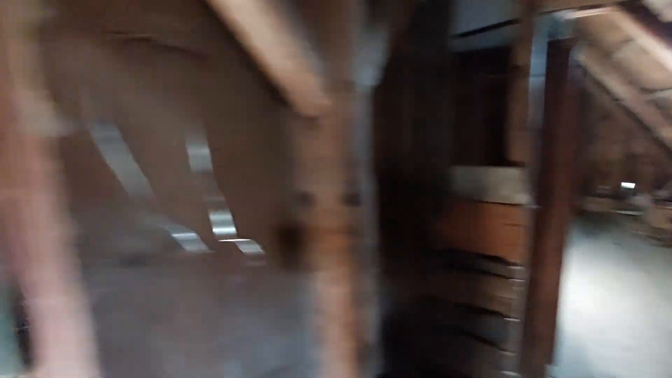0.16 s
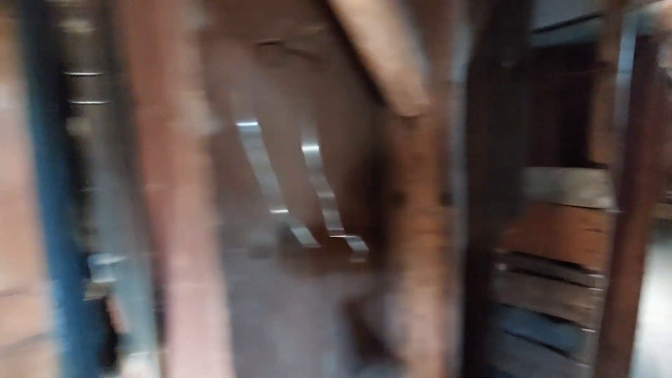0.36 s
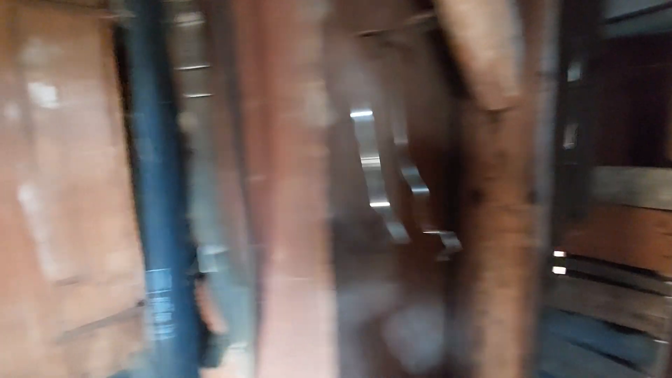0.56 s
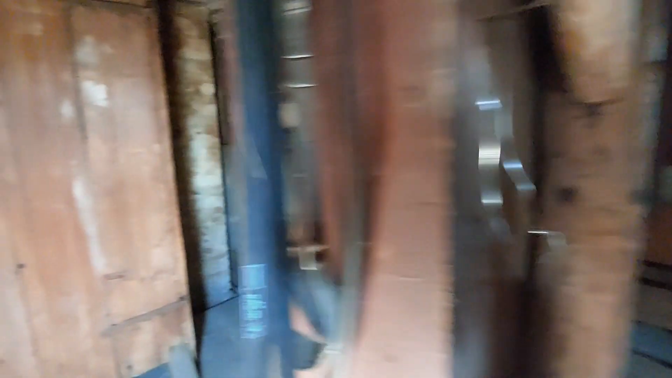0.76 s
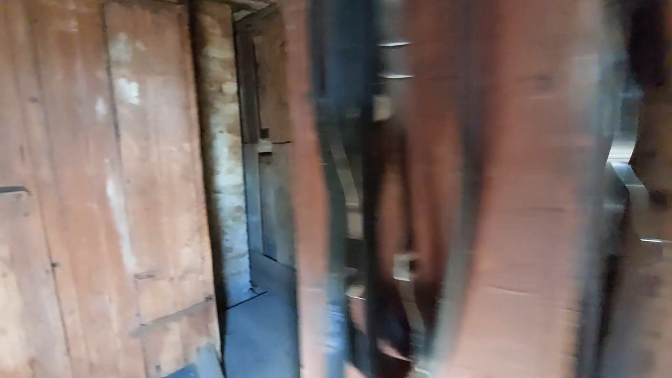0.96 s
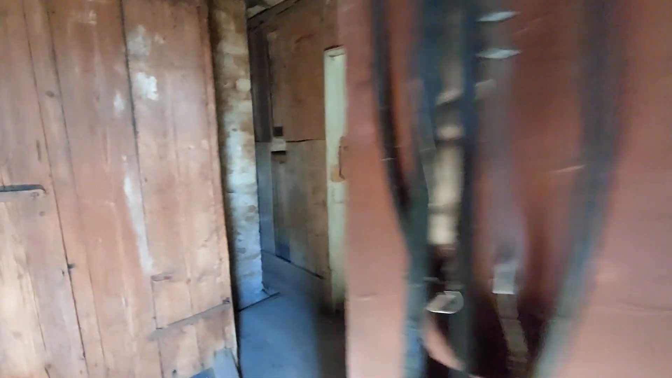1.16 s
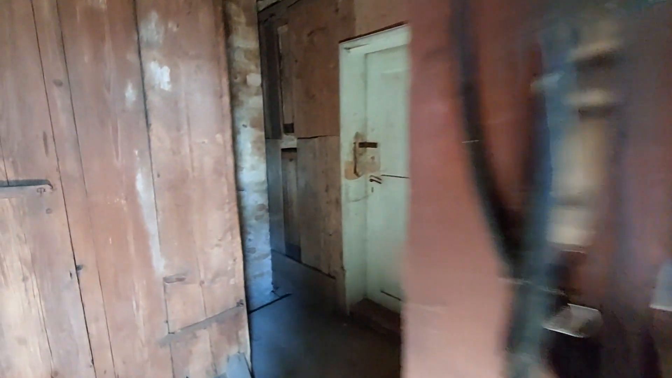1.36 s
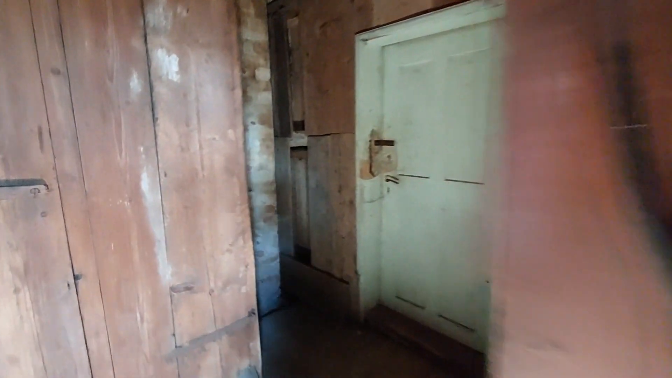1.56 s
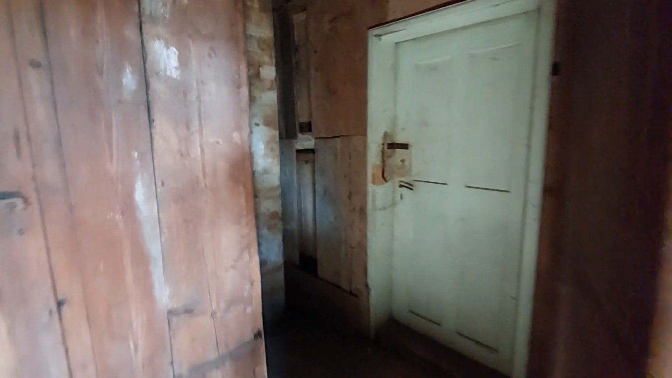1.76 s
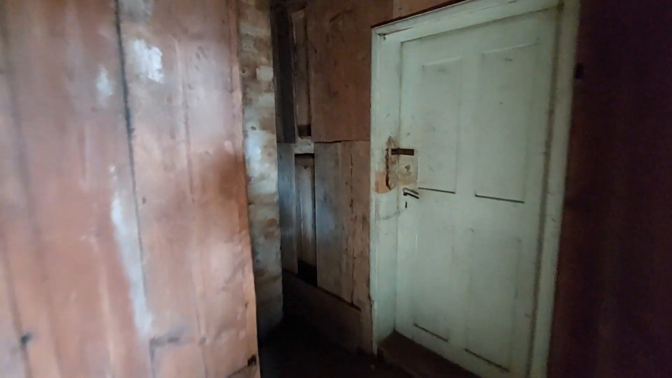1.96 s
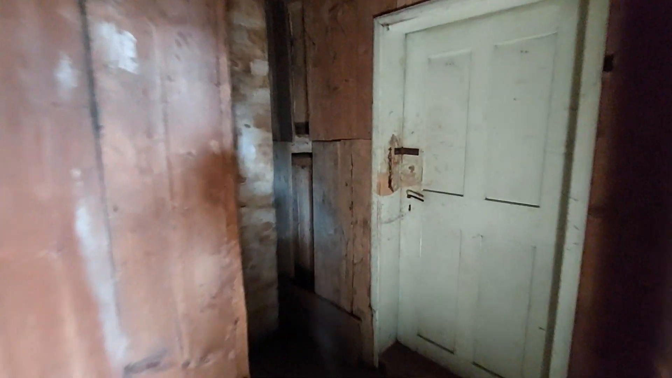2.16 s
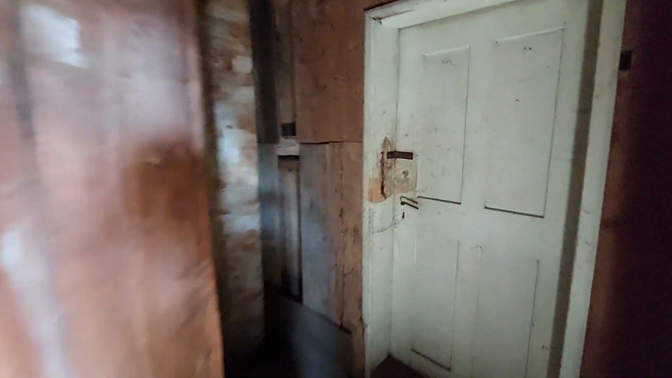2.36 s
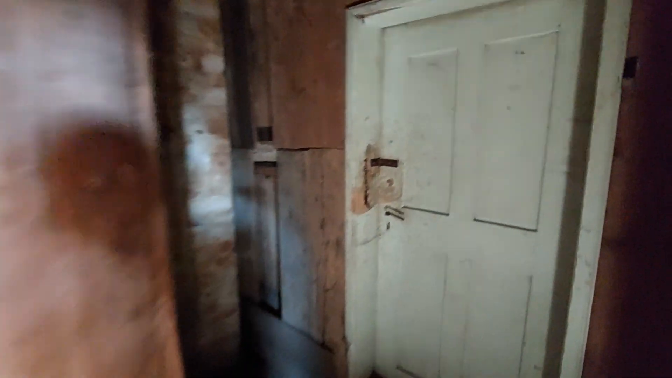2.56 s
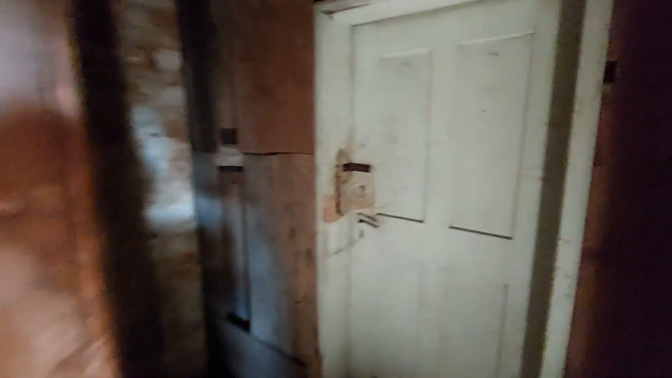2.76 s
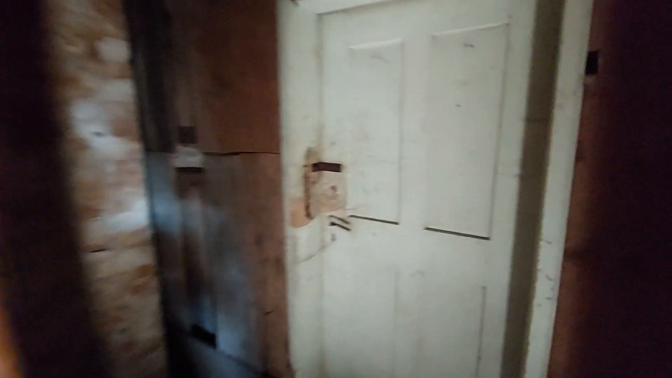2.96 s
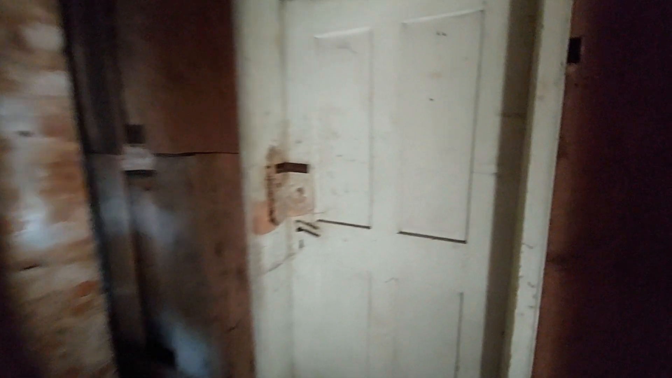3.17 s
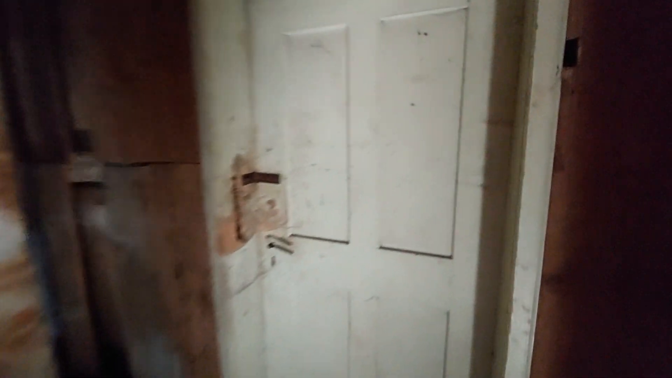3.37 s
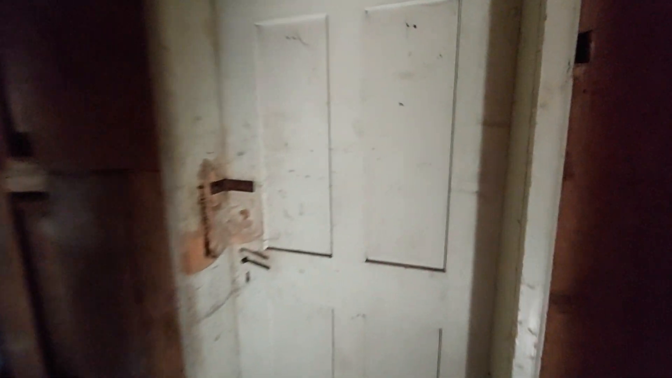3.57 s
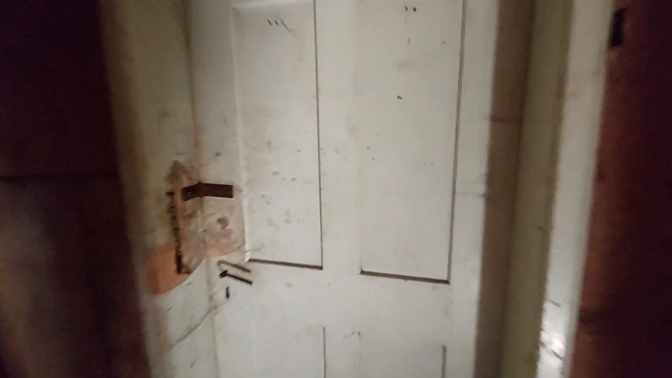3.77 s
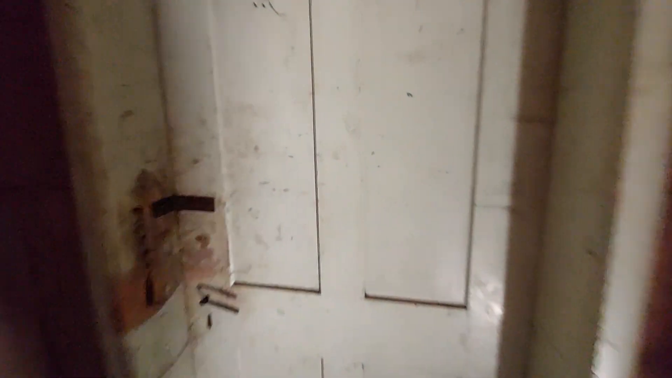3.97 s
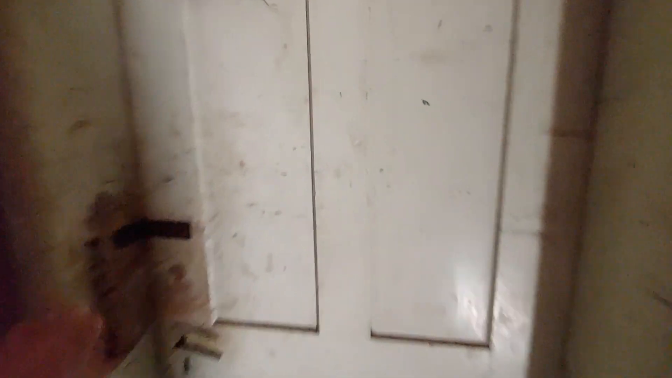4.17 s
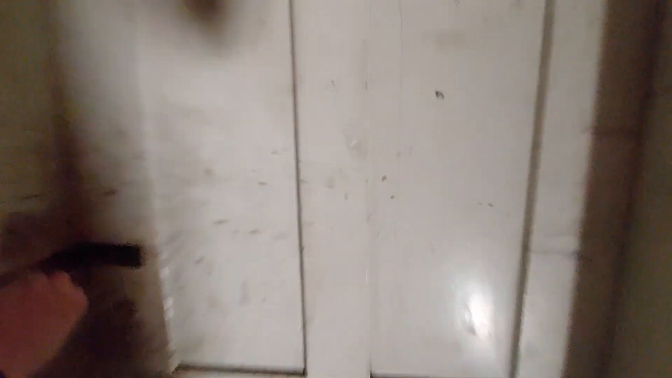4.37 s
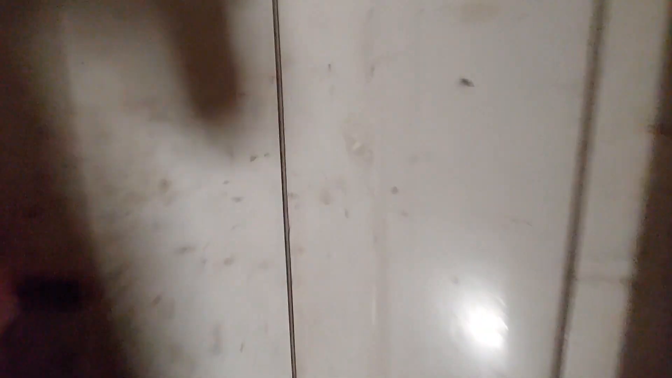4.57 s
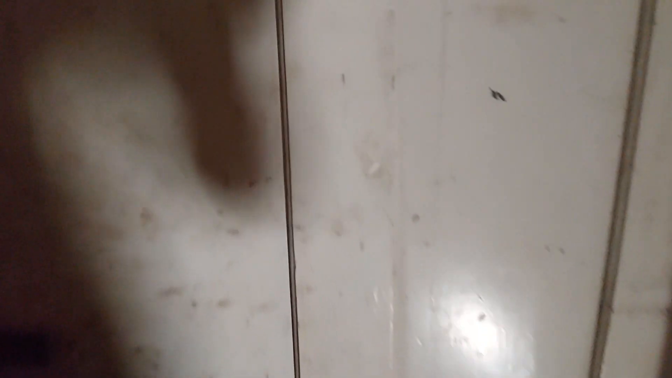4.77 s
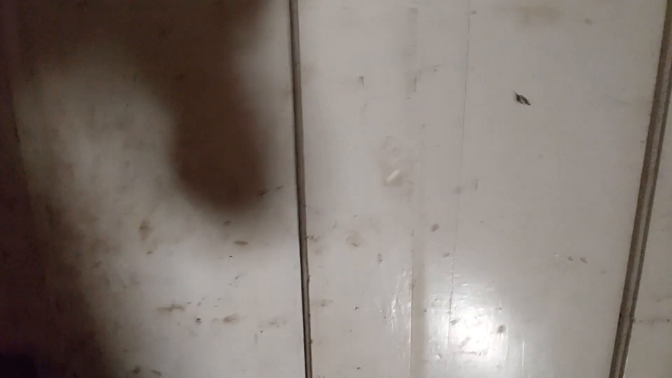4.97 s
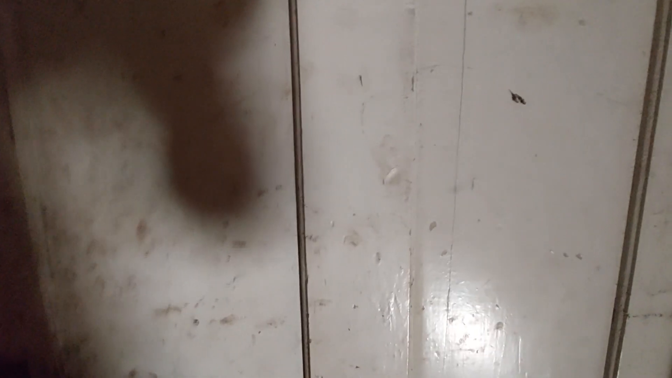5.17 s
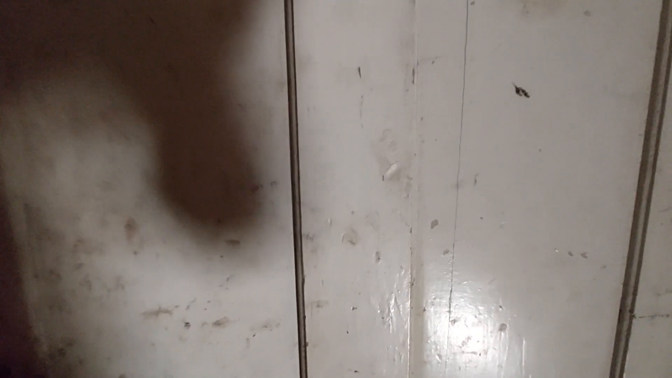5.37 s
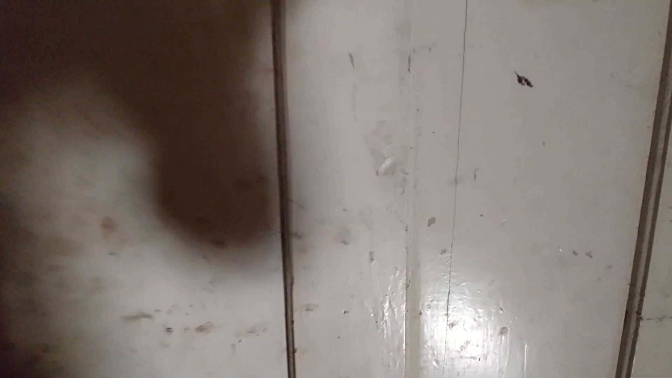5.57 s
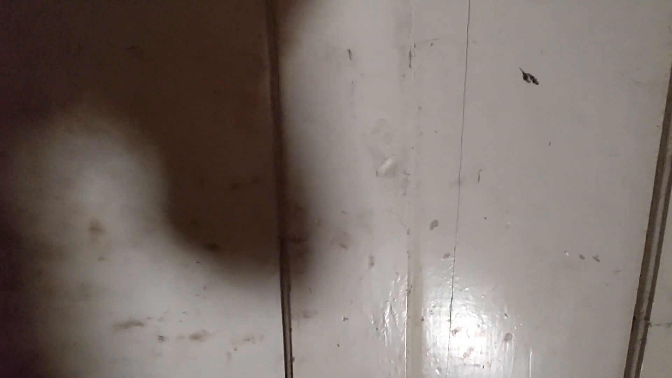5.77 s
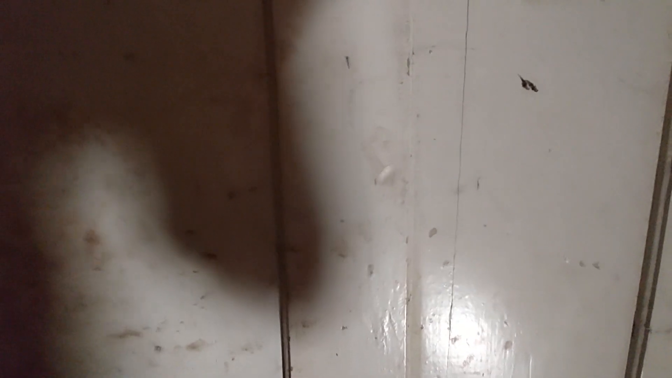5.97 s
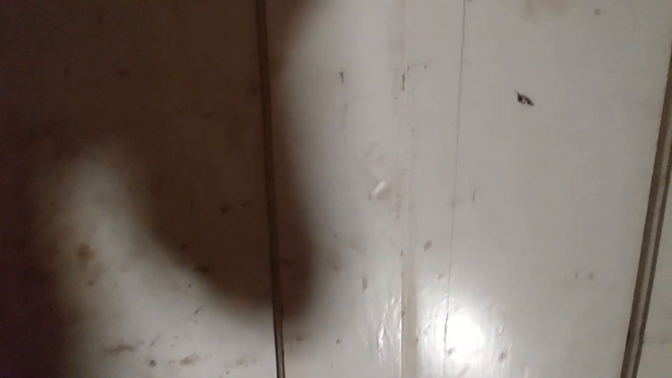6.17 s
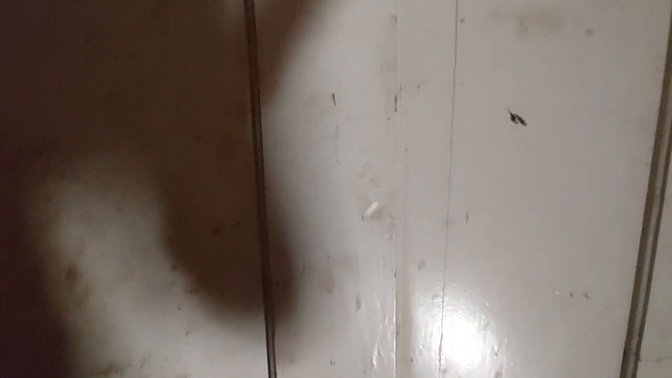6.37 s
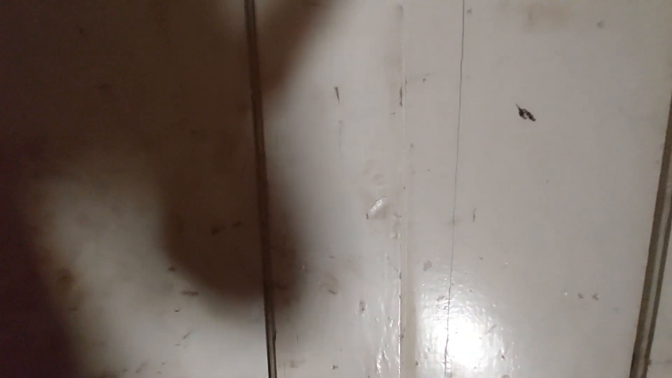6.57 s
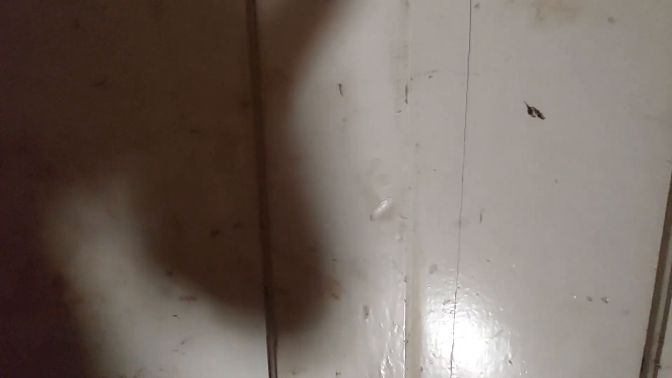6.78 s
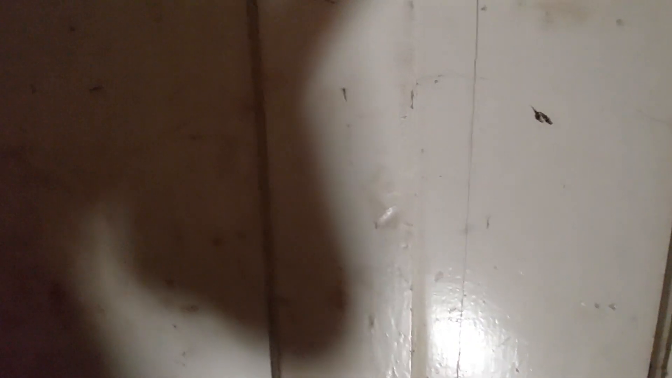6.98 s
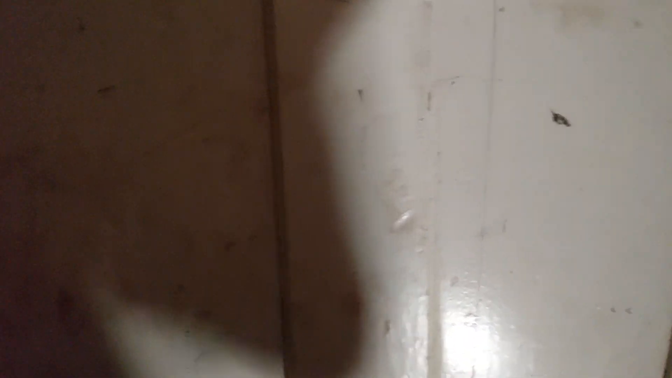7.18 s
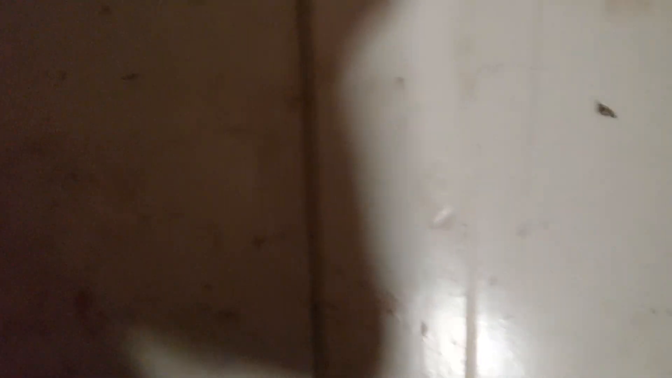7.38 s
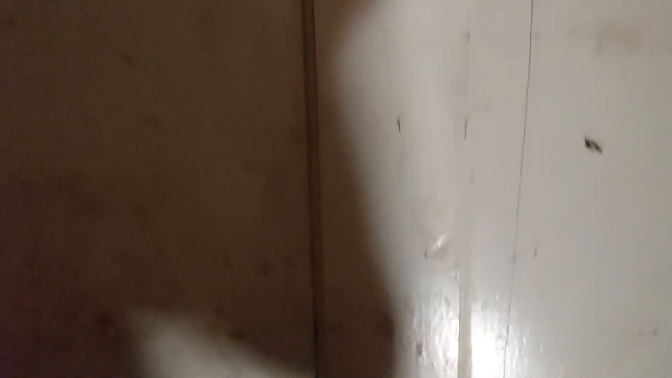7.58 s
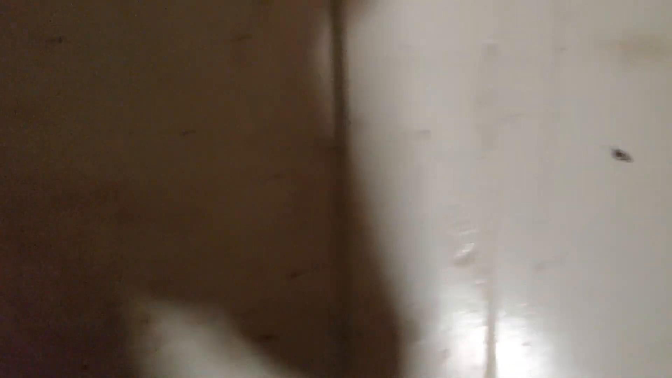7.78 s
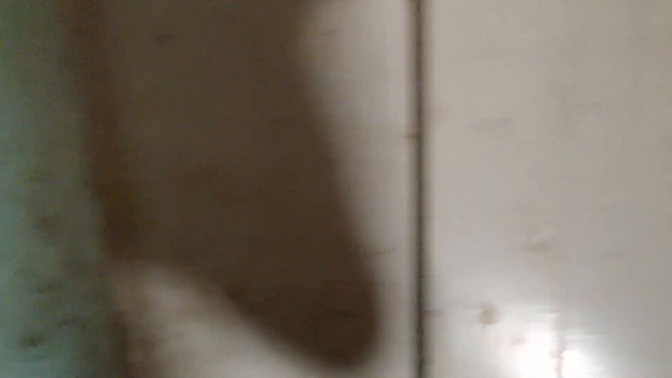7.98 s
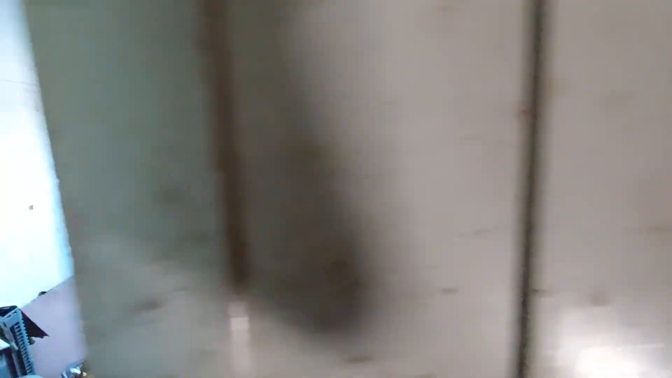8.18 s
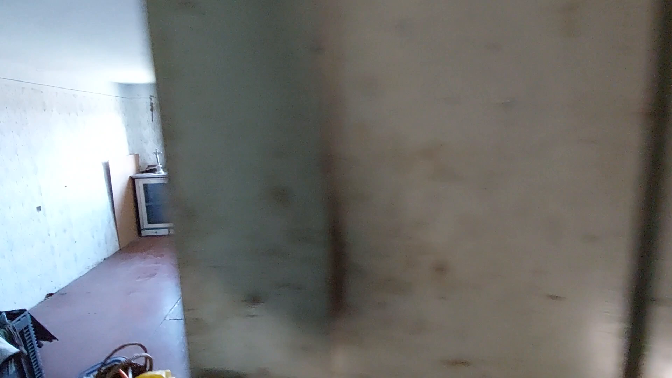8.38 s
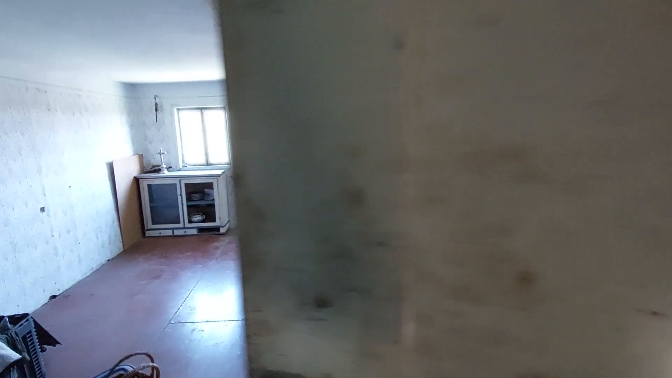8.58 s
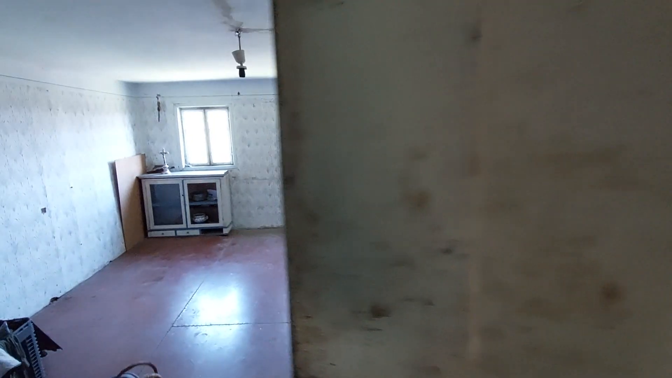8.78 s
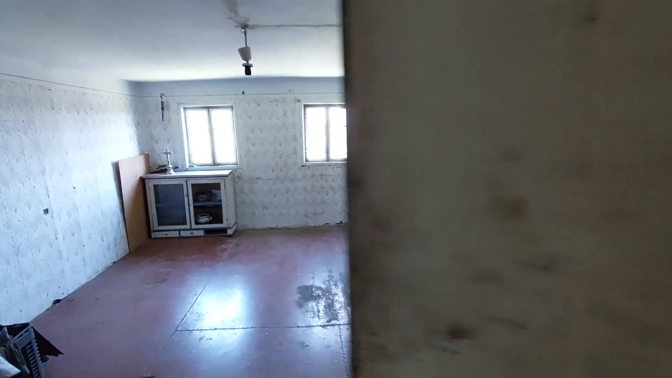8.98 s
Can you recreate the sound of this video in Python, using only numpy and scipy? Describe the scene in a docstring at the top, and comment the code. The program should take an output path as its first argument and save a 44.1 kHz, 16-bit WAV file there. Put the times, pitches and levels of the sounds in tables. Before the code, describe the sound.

Close by in a quiet attic, someone walks over hollow wooden boards, soles scuffing and grit crackling softly. The steps get heavier, then give way to small metal clicks at a door latch. The latch snaps loudly and the wooden panel thuds under repeated shoves, until the stuck door bursts open with a clatter and a tiny squeak. Faint footsteps end it, over a low background rumble.

```python
"""Footsteps cross bare attic floorboards; the walker works a stiff latch and pulls a wooden door open.
Heel and toe ring the boards, and grit cracks under the soles. Shoves ring the door panel, iron parts
click, and the door edge squeals as it tears free of the frame. Soles and clothes scuff; the attic
reverberates. Behind it all: rumble, hiss, a brief low hum and a far bird outside."""
import sys
import numpy as np
from scipy import signal
from scipy.fft import rfft, irfft, next_fast_len
from scipy.io import wavfile
from scipy.ndimage import uniform_filter1d

SR = 44100
rng = np.random.default_rng(int(sys.argv[2]) if len(sys.argv) > 2 else 0)


def pcm_store(signal):
    """Save signal as 16-bit PCM."""
    levels = np.round(np.clip(np.atleast_2d(signal), -1, 1) * 32767)
    wavfile.write(sys.argv[1], SR, levels.astype(np.int16).T)


N = 398663

# board modes: f/Hz, level/dB, nominal t60/s
BOARD_MODES = [(53.3, -5, 0.97), (69.2, 15, 0.11), (80.7, -2, 0.87), (97.9, -4.5, 0.48),
               (125.2, -6.5, 0.46), (150.7, 6.5, 0.18), (172.3, -11.5, 0.27), (211, -1.5, 0.13),
               (233.7, -2.5, 0.19), (293.4, 4, 0.07), (333, -1.5, 0.089), (369, 2, 0.097),
               (433, -1.5, 0.13), (488, 2.5, 0.077), (571, -2, 0.1), (670, -2.5, 0.081), (757, -4, 0.045),
               (920, -5, 0.07), (1210, -0.5, 0.015), (1700, -1, 0.04), (2100, -18, .04)]
# heel and toe blows: t/s, level/dB, centre f/Hz, t60 factor
FOOTFALLS = [(0.009, -47, 92, 0.64), (0.062, -39, 330, 0.6), (0.084, -32.5, 85, 0.32),
             (0.721, -47.5, 62, 0.95), (0.807, -36, 75, 0.5), (0.822, -29, 68, 0.78),
             (0.916, -39, 71.6, 0.47), (1.631, -25, 140, 0.74), (1.719, -31.5, 94, 0.64),
             (1.78, -39.5, 123, 0.53), (1.909, -42.5, 106, 0.99), (2.3, -47, 280, 1),
             (2.457, -33, 111, 0.47), (2.571, -34.5, 133, 0.8), (2.624, -37.5, 210, 0.8),
             (2.692, -38.5, 90, 0.9), (2.726, -44, 260, 1), (3.051, -24.5, 202, 0.62),
             (3.151, -33.5, 240, 0.27), (3.363, -44, 99, 0.38), (3.893, -18.5, 150, 0.65),
             (3.999, -32.5, 163, 0.24), (4.09, -44, 69.7, 0.45), (4.477, -14.5, 155, 0.55),
             (4.564, -29.5, 280, 0.28), (4.583, -30, 150, 0.5), (4.695, -41, 300, 0.68),
             (4.955, -22, 144, 0.4), (4.998, -32.5, 139, 0.4), (7.996, -36.5, 142, 0.64),
             (8.029, -43, 140, 0.5), (8.144, -36, 66, 0.3), (8.517, -47.5, 206.6, 1),
             (8.969, -54, 65.1, 0.8)]
def footsteps():
    """Feet ring the boards; low, hard blows reach more octaves up. The last steps are louder on the left."""
    s, db, hz, t60_factor = np.transpose(FOOTFALLS)
    above_oct = 1.4 - 0.51 * np.log2(hz / 100) + 0.002 * (db + 30.5)
    blows = zip(s, db, hz, t60_factor, above_oct)
    boards = thumps(blows, BOARD_MODES, below_oct=0.68, rise_cycles=0.34, roll_s=0.027, detune=0.02)
    pan_db = 4 * (np.arange(N) / SR > 7.9)
    return gain_of([pan_db, -pan_db]) * boards


def thumps(blows, modes, below_oct, rise_cycles, roll_s, detune):
    """Blows on wood: one contact, then weaker ones as the weight rolls on, slightly unlike per channel."""
    out = np.zeros((2, N))
    for s, db, hz, t60_factor, above_oct in blows:
        when, strength, *unlike = rng.random((4, 5))
        at = (roll_s * when * SR).astype(int)
        contacts = np.zeros((2, SR // 10))
        contacts[:, at] = 0.79 * (2 * strength - 1) + 0.14 * (2 * np.array(unlike) - 1)
        contacts[:, 0] = 1
        wood = ring(modes, hz, below_oct, above_oct, t60_factor, rise_cycles, detune, size=SR // 2)
        sound = signal.fftconvolve(wood[None], contacts, axes=1)
        add(out, s, gain_of(db) * sound / abs(sound).max())
    return out


def ring(modes, centre_hz, below_oct, above_oct, t60_factor, rise_cycles, detune, size):
    """A blow rings the modes near centre_hz; where it lands varies their phase, strength and tuning."""
    hz, db, t60 = np.transpose(modes)[:, :, None]
    t = np.arange(size) / SR
    phase, strength, tuning = rng.standard_normal((3, len(modes), 1))
    reach_oct = np.where(hz > centre_hz, max(above_oct, 0.2), below_oct)
    reach_db = -6 * (np.log2(hz / centre_hz) / reach_oct) ** 2
    level = gain_of(db + reach_db + 2.6 * strength - 60 * t / (t60 * t60_factor))
    attack = 1 - np.exp(-t * hz / rise_cycles)
    partials = np.sin(2 * np.pi * (hz * (1 + detune * tuning) * t + phase))
    sound = (level * attack * partials).sum(0)
    return sound / abs(sound).max()


# grit cracks: t/s, level/dB, top f/Hz
GRIT_CRACKS = [(0.0624, -38, 2400), (1.705, -36, 14000), (2.332, -43.5, 9000), (3.169, -45, 3520),
               (4.734, -43, 15000), (5.1722, -44.5, 5000)]
def grit():
    """Grit cracks under the soles in dry ticks."""
    out = np.zeros((2, N))
    for s, db, top_hz in GRIT_CRACKS:
        tick = snap(tilt_db_oct=-4, low_hz=400, top_hz=top_hz, rise_s=0.00077, t60_s=0.035)
        add(out, s, gain_of(db) * tick)
    return out


# panel modes: f/Hz, level/dB, nominal t60/s
PANEL_MODES = [(60, 6.5, 0.22), (89, -0.5, 0.79), (110, 2, 0.21), (153, 1.5, 0.19), (203.6, 3, 0.18),
               (237, 3.5, 0.37), (296, -5, 0.094), (340, -6, 0.12), (430, -6, 0.15), (480, 3, 0.11),
               (598, -9, 0.12), (655, -7.5, 0.12), (718, -1, 0.08), (815, -1, 0.064), (940, -1.5, 0.08),
               (1300, -6, 0.074)]
# blows and shoves: t/s, level/dB, centre f/Hz, upward reach/oct
PANEL_BLOWS = [(5.858, -37.5, 554, 3.1), (5.896, -35, 153, 5.8), (6.032, -41, 222, 3.9),
               (6.259, -36.5, 258.5, 2.3), (6.482, -46, 220, 0.54), (6.521, -44.5, 464, 0.39),
               (6.755, -25, 223.7, 0.63), (6.788, -9.5, 470, 0.89), (6.796, -19.5, 69.9, 0.42),
               (6.815, -16, 230, 0.6), (6.842, -14.5, 150.7, 0.74), (6.862, -17, 114.5, 0.6),
               (6.883, -19.5, 124.6, 0.55), (6.968, -22, 880, 0.5), (6.971, -21, 241, 0.8),
               (7.022, -25, 860, 0.4), (7.148, -21, 229.2, 0.93), (7.159, -21, 107.7, 0.5),
               (7.258, -26.5, 117.2, 1.5), (7.383, -11.5, 472, 0.61), (7.408, -13.5, 521.4, 1.4),
               (7.428, -19, 201.6, 1.4), (7.449, -17, 462, 3.5), (7.462, -22.5, 948, 0.6),
               (7.469, -19, 130, 1), (7.686, -17.5, 300.8, 1.15), (7.721, -24.5, 93, 1.36)]
def door_panel():
    """Blows ring the panel, shorter while it is pressed into the frame."""
    s, db, hz, above_oct = np.transpose(PANEL_BLOWS)
    pressed = (s > 6.78) & (s < 7.2)
    t60_factor = np.where(pressed, 0.32, 0.72)
    blows = zip(s, db, hz, t60_factor, above_oct)
    return thumps(blows, PANEL_MODES, below_oct=0.7, rise_cycles=0.18, roll_s=0.015, detune=0.0079)


# iron modes: f/Hz, level/dB, nominal t60/s
IRON_MODES = [(1617, 2.5, 0.11), (1765, -6, 0.15), (2080, -3, 0.08), (2400, -3.5, 0.041), (2719, -4, 0.063),
              (3150, 1, 0.1), (3680, -2, 0.07), (4200, -9, 0.068), (5220, -5.5, 0.07), (6400, -11, 0.048),
              (7400, -3.5, 0.064), (9115, -10, .05), (10500, 4, .05), (12900, 4, .04), (14500, 4, .04)]
# latch, key and bolt: t/s, level/dB, centre f/Hz, tilt/(dB/oct)
LATCH_CLICKS = [(4.744, -32, 3850, 1), (4.752, -35, 1670, -17), (4.807, -45, 2260, 0),
                (4.822, -38, 2300, -5), (5.097, -46, 1650, -8), (5.504, -57.5, 1710, -4.5),
                (5.6299, -54.5, 1590, -1.5), (5.8604, -33, 3400, -1.5), (5.896, -27, 2800, -6.5),
                (6.0353, -38.5, 2520, -3.5), (6.257, -54, 2420, -4.5), (6.518, -53.5, 2723, -5),
                (6.6156, -33.5, 7500, 0), (6.767, -39.5, 2500, -10.5), (6.791, -1, 3000, -4),
                (6.969, -36, 2400, -5.5), (7.0392, -38, 1732, -7), (7.149, -42.5, 3795, -5),
                (7.192, -45, 1800, -14.5), (7.257, -53.5, 5610, -3.5), (7.3821, -13.5, 13200, 2),
                (7.393, -8, 2600, -3), (7.4263, -8.5, 2083, -9), (7.448, -2.5, 2180, -4.5),
                (7.6876, -32, 2130, -0.5), (7.708, -38, 2100, -4), (7.7243, -32, 2140, 1)]
def latch(pan_db=0.75):
    """Each click is a snap and the iron it sets ringing, slightly to the left."""
    out = np.zeros((2, N))
    for s, db, hz, tilt_db_oct in LATCH_CLICKS:
        top_hz = 1.2 * hz * 2 ** ((db + 31) / 11)  # harder is brighter
        contact = snap(tilt_db_oct, 0.3 * hz, top_hz, rise_s=0.0014, t60_s=0.032)
        iron = ring(IRON_MODES, hz, below_oct=0.45, above_oct=0.69, t60_factor=0.18,
                    rise_cycles=1.8, detune=0.027, size=SR // 8)
        add(out, s, gain_of([[db + pan_db], [db - pan_db]]) * (contact + gain_of(-4.5) * iron))
    return out


def snap(tilt_db_oct, low_hz, top_hz, rise_s, t60_s):
    """Fast-dying noise burst, peak 1, partly unlike per channel."""
    t = np.arange(SR // 8) / SR
    common, *sides = band_noise(tilt_db_oct, low_hz, top_hz, channels=3, size=len(t))
    envelope = gain_of(-60 * t / t60_s) * (1 - np.exp(-t / rise_s))
    sound = (common + 0.79 * np.array(sides)) * envelope
    return sound / abs(sound).max()


# door edge slipping: t/s, f/Hz, level/dB
SQUEAL_CURVE = [(7.389, 2420, -23), (7.416, 2707, -27), (7.422, 2143, -29.5), (7.429, 2060, -21.5),
                (7.448, 1992, -26)]
def door_squeal():
    """Wood slips on wood: a rough tone and its octave climb, then drop."""
    out = np.zeros((2, N))
    s, hz, db = np.transpose(SQUEAL_CURVE)
    t = np.arange(s[0], s[-1], 1 / SR)
    pitch_hz = np.interp(t, s, hz)
    tone = rough_tone(pitch_hz, width_hz=110) + gain_of(-5.5) * rough_tone(2 * pitch_hz, width_hz=250)
    add(out, s[0], gain_of(np.interp(t, s, db)) * tone * signal.windows.tukey(len(t), 0.15))
    return out


def rough_tone(hz, width_hz):
    """Noise through a narrow resonance that follows the curve hz."""
    real, imag = rng.standard_normal((len(hz), 2)).T
    pole = np.exp(-np.pi * width_hz / SR)
    envelope = signal.lfilter([1], [1, -pole], real + 1j * imag)
    return unit_rms((envelope * np.exp(2j * np.pi * np.cumsum(hz) / SR)).real)


# noise swells: t/s, level/dB, tilt/(dB/oct), low f/Hz
NOISE_SWELLS = [(0.064, -57.5, -19.5, 900), (0.822, -59.5, -11, 200), (0.705, -72, -2, 1500),
                (1.359, -67.5, -5, 680), (1.63, -45, -7, 302), (1.766, -51, -9.5, 300),
                (2.22, -62.5, -4, 1580), (2.309, -50, -9, 300), (2.452, -53.5, -17.5, 300),
                (2.575, -55.5, -12.5, 250), (2.7, -58.5, -27, 394), (3.054, -56.5, -2, 500),
                (3.162, -54, -6.5, 300), (3.889, -65.5, -4.5, 500), (4.486, -67, -1.5, 1200),
                (4.568, -63.5, -5.5, 600), (4.695, -54.5, -7.5, 300), (4.75, -46.5, -10.5, 300),
                (4.812, -55, -6, 396), (4.958, -50, -6, 890), (5.054, -55.5, -6.5, 398),
                (5.092, -58, -9, 1190), (5.84, -64, -5, 700), (6.018, -54.5, -5.5, 696),
                (6.49, -66, -7, 1470), (6.757, -51, -10, 300), (7.365, -36.5, -8.5, 196),
                (7.388, -24.5, 9, 12000), (8.505, -74, -10, 300)]
def scuffs_and_swell():
    """Grainy scuffs; at 7.365 s, a short, dull swell of noise just before the door's loud crack."""
    out = np.zeros((2, N))
    t = np.arange(SR // 3) / SR
    for s, db, tilt_db_oct, low_hz in NOISE_SWELLS:
        length_s = np.clip(0.035 * 2 ** (-(db + 56.5) / 4.5), 0.041, 0.13)  # louder is shorter
        grain_db = 3.9 * unit_rms(uniform_filter1d(rng.standard_normal(len(t)), size=150))
        envelope = (1 - np.exp(-t / 0.0026)) * np.exp(-(t / length_s) ** 2)
        noise = band_noise(tilt_db_oct, low_hz, top_hz=SR, channels=2, size=len(t))
        add(out, s, gain_of(db) * envelope * unit_rms(gain_of(grain_db)) * noise)
    return out


# base spectrum of snaps, scuffs and swell: f/Hz, level/dB
BAND_SPECTRUM = [(200, -22.5), (500, 0.5), (1200, -2.5), (2200, -2), (3500, -1), (7000, -1), (16000, -10)]
def band_noise(tilt_db_oct, low_hz, top_hz, channels, size):
    """Tilted noise from low_hz to top_hz, faint above."""
    hz = np.fft.rfftfreq(size, 1 / SR)
    colour = gain_of(at_hz(BAND_SPECTRUM, hz) + tilt_db_oct * np.log2((hz + 300) / 4000))
    low_cut = 1 / (1 + (low_hz / (hz + 1)) ** 4)
    high_shelf = gain_of(-19) + 1 / (1 + (hz / top_hz) ** 6)
    white = rfft(rng.standard_normal((channels, size)))
    return unit_rms(irfft(white * colour * low_cut * high_shelf, size))


# attic decay: f/Hz, t60/s
ATTIC_DECAY = [(60, 1), (250, 0.34), (1000, 0.27), (2200, 0.28), (4500, 0.33), (8000, 0.24), (15000, 0.27)]
def attic(x, colour):
    """Sparse reflections die band by band, alike on both sides in the bass; three tails take turns."""
    out = np.zeros((2, N))
    turn = np.arange(N) / SR * 7.3
    for k in range(3):
        taps = np.zeros((2, SR))
        at = np.arange(120, SR - 20, 20) + rng.integers(0, 20, (2, (SR - 121) // 20))
        np.put_along_axis(taps, at, rng.choice([-1., 1.], at.shape), 1)
        hz, t, bands = signal.stft(taps, SR, nperseg=512, noverlap=448)
        coherence = 0.97 * np.exp(-(hz / 500) ** 2)[:, None]
        bands[1] = coherence * bands[0] + np.sqrt(1 - coherence ** 2) * bands[1]
        decay = gain_of(-60 * t / at_hz(ATTIC_DECAY, hz)[:, None])
        decay /= np.linalg.norm(decay, axis=1, keepdims=True)
        bands *= decay * gain_of(at_hz(colour, hz))[:, None]
        tail = signal.istft(bands, SR, nperseg=512, noverlap=448)[1] * np.sqrt(20 / 64)  # spacing / hop
        crossfade = np.sqrt(2 / 3) * np.cos(np.pi * (turn + k / 3))
        out += signal.oaconvolve(x * crossfade, tail, axes=1)[:, :N]
    return out


# noise spectra: f/Hz, density/dB
RUMBLE_SPECTRUM = [(25, -8.5), (43, -7.5), (97, -2), (175, -17.5), (226, -11), (370, -19.5), (554, -28),
                   (2000, -48.5), (2600, -90.5)]
HISS_SPECTRUM = [(590, -37), (1000, 0.5), (1380, 0), (1790, 2.5), (4120, -4), (7350, 1), (13800, -7),
                 (16000, -16)]
# noise envelopes: t/s, rumble level/dB, hiss level/dB
NOISE_LEVELS = [(0, -47, -75), (.3, -67, -80), (1.2, -63, -80.5), (1.9, -65.5, -79), (2.8, -62, -79),
                (3.7, -66, -79.5), (4.3, -58, -75.5), (5.5, -63, -81), (6.7, -60.5, -79.5), (7.1, -46, -75),
                (7.85, -66.5, -84), (8.4, -75.5, -85), (8.75, -73.5, -88), (8.85, -71.5, -77.5),
                (9.04, -70, -78.5)]
def rumble_and_hiss(pan_db=2.5):
    """Low rumble and hiss; both dip for about a second after the loudest bangs."""
    s, *levels = np.transpose(NOISE_LEVELS)
    rumble_db, hiss_db = (np.interp(np.arange(N) / SR, s, db) for db in levels)
    rumble = patchy_noise(RUMBLE_SPECTRUM, patchy_db=0.5, alike_hz=1500, size=2048)
    hiss = patchy_noise(HISS_SPECTRUM, patchy_db=2.5, alike_hz=894.7, size=512)
    return gain_of([rumble_db + pan_db, rumble_db - pan_db]) * rumble + gain_of(hiss_db) * hiss


def patchy_noise(spectrum, patchy_db, alike_hz, size):
    """Stereo noise with random level patches, nearly alike on both sides well below alike_hz."""
    hop, hz = size // 4, np.fft.rfftfreq(size, 1 / SR)
    a, b, c, d, patches = rng.standard_normal((N // hop + 5, len(hz), 5)).T
    patches = unit_rms(uniform_filter1d(uniform_filter1d(patches, size=6, axis=0), size=10, axis=1))
    coherence = 0.9 * np.exp(-hz / alike_hz)[:, None]
    left = a + 1j * b
    right = coherence * left + np.sqrt(1 - coherence ** 2) * (c + 1j * d)
    bands = np.array([left, right]) * gain_of(at_hz(spectrum, hz)[:, None] + patchy_db * patches)
    return unit_rms(signal.istft(bands, nperseg=size, noverlap=size - hop)[1][:, :N])


# low hum: t/s, length/s, f/Hz, width/Hz, level/dB
HUM_SWELL = (0.87, 2, 98, 0, -61.5)
def hum():
    """A fuzzy low tone swells and fades."""
    out = np.zeros((2, N))
    s, length_s, hz, width_hz, db = HUM_SWELL
    size = round(length_s * SR)
    add(out, s, gain_of(db) * rough_tone(np.full(size, hz), width_hz) * signal.windows.tukey(size, 0.6))
    return out


# calls: t/s, length/s
BIRD_CALLS = [(0.318, 0.16), (1.029, 0.18)]
def bird(pitch_hz=4070, level_db=-82.5):
    """A wavering, slightly falling whistle, blurred by distance."""
    out = np.zeros((2, N))
    for s, length_s in BIRD_CALLS:
        t = np.arange(0, length_s, 1 / SR)
        waver = unit_rms(uniform_filter1d(rng.standard_normal((2, SR // 4)), size=200))[:, :len(t)]
        hz = pitch_hz * (1 - 0.12 * t + 0.021 * waver)
        whistle = np.sin(2 * np.pi * np.cumsum(hz, axis=1) / SR)
        add(out, s, gain_of(level_db) * whistle * np.hanning(len(t)))
    return out


def port_delay(x, left_late_s):
    """Sound reaches one microphone port before the other."""
    size = next_fast_len(N + 256)
    hz = np.fft.rfftfreq(size, 1 / SR)
    shift = np.exp(-1j * np.pi * hz * left_late_s * np.array([[1], [-1]]))
    return irfft(rfft(x, size) * shift, size)[:, :N]


def gain_of(db):
    return 10 ** (np.asarray(db) / 20)


def unit_rms(x):
    return x / np.sqrt(np.mean(x ** 2) + 1e-20)


def at_hz(points, hz):
    """Interpolates on a log-frequency axis."""
    f, value = np.transpose(points)
    return np.interp(np.log(hz + 1), np.log(f + 1), value)


def add(mix, s, sound):
    """Mixes a sound in at s seconds."""
    part = mix[..., round(s * SR):][..., :sound.shape[-1]]
    part += sound[..., :part.shape[-1]]


def scene():
    """Feet, door and scuffs in the attic, over the background."""
    feet = footsteps() + grit()
    door = door_panel() + latch() + door_squeal()
    swells = scuffs_and_swell()
    colour = [(60, -16.5), (300, -2.5), (1500, 0), (4500, -5), (7000, -9.5), (15000, -9.5)]  # f/Hz, level/dB
    reverb = attic(feet + gain_of(-0.5) * door + swells, colour)
    direct = port_delay(gain_of([[-0.7], [0.7]]) * feet, 0.000252) + port_delay(door, -0.0004444)
    return direct + swells + reverb + rumble_and_hiss() + hum() + bird()


# microphone port lift: f/Hz, width/oct, gain/dB
PORT_LIFT = (14000, 0.27, 6.5)
def record(dry, low_cut_hz=36, edge_hz=16200):
    """Low cut, treble lift of the ports, soft clipping, band limit."""
    low_cut = signal.butter(3, low_cut_hz, "high", fs=SR, output="sos")
    peak_hz, width_oct, lift_db = PORT_LIFT
    hz = np.linspace(0, SR / 2, 200)
    bell = np.exp(-(np.log2((hz + 1) / peak_hz) / width_oct) ** 2)
    lift = signal.firwin2(255, hz, gain_of(lift_db * bell), fs=SR)
    lifted = signal.oaconvolve(signal.sosfilt(low_cut, dry), lift[None], "same")
    band_limit = signal.firwin(511, edge_hz, window=("kaiser", 9), fs=SR)
    return signal.oaconvolve(np.tanh(lifted), band_limit[None], "same")


dry = scene()
out = record(dry)
pcm_store(out)
```